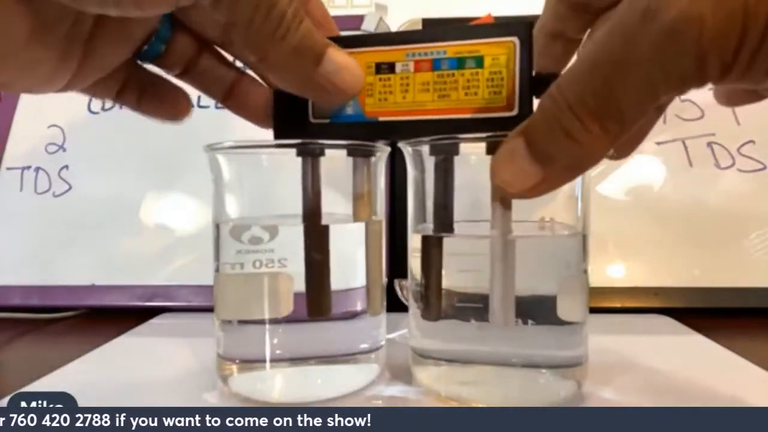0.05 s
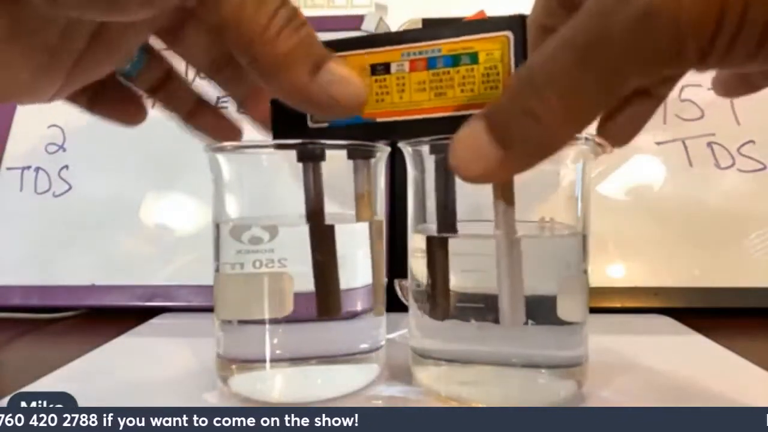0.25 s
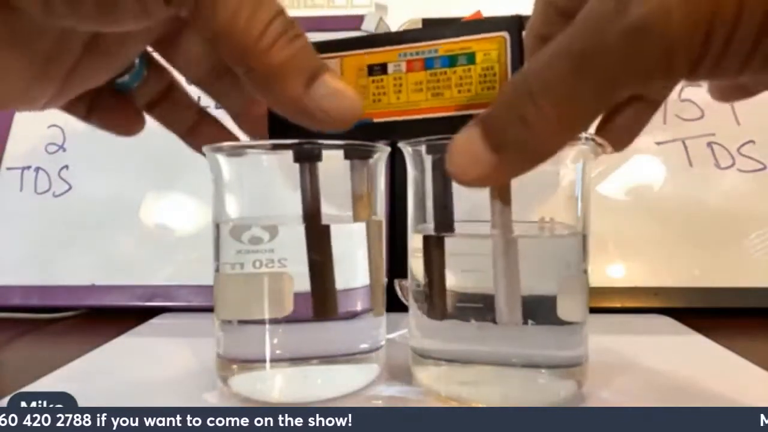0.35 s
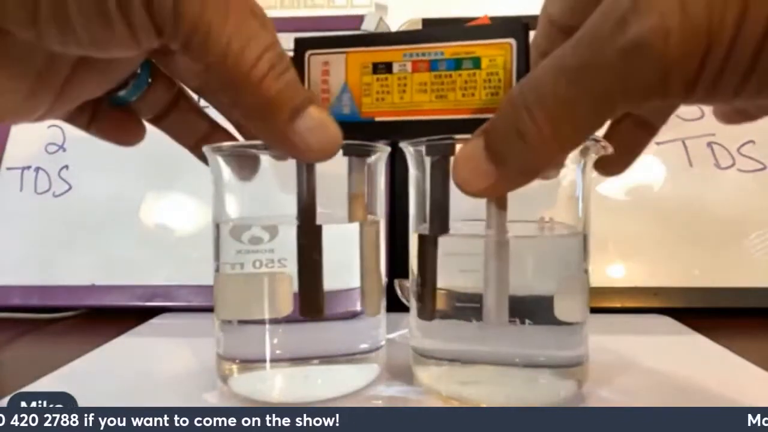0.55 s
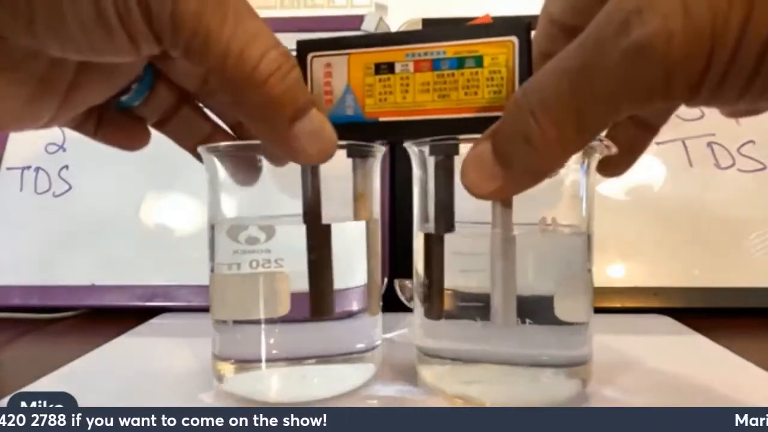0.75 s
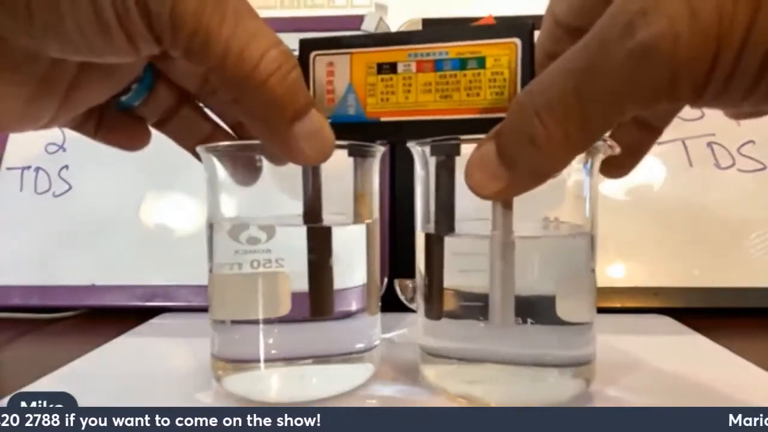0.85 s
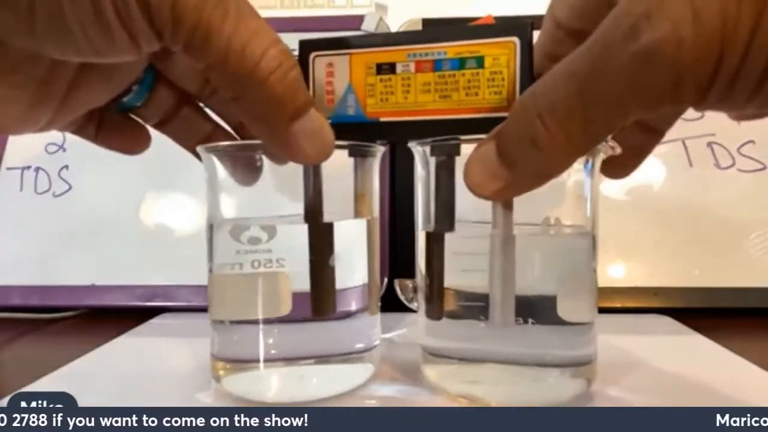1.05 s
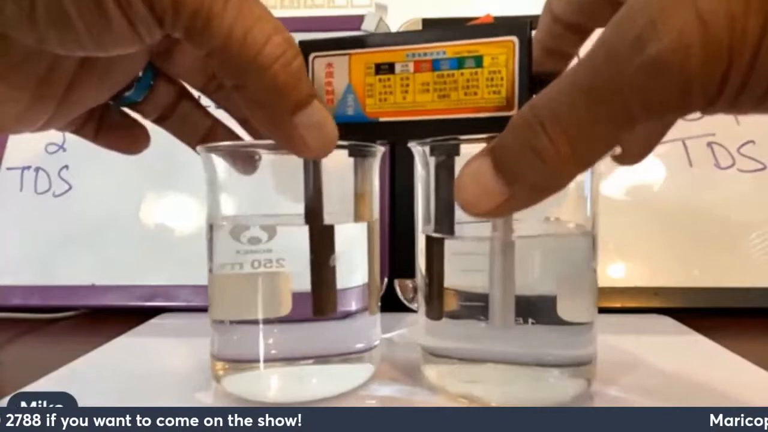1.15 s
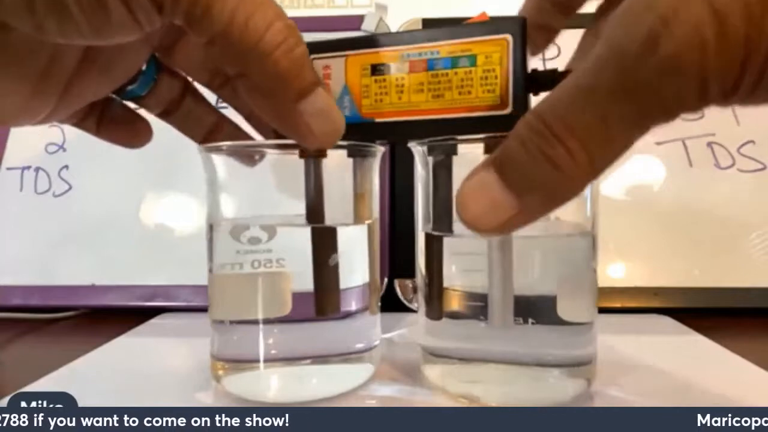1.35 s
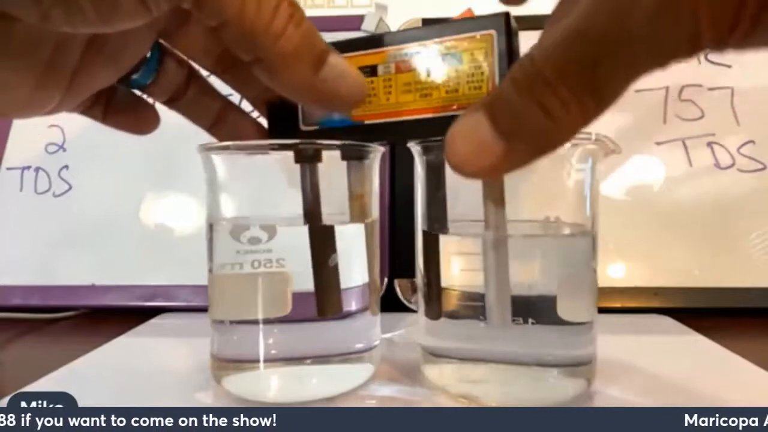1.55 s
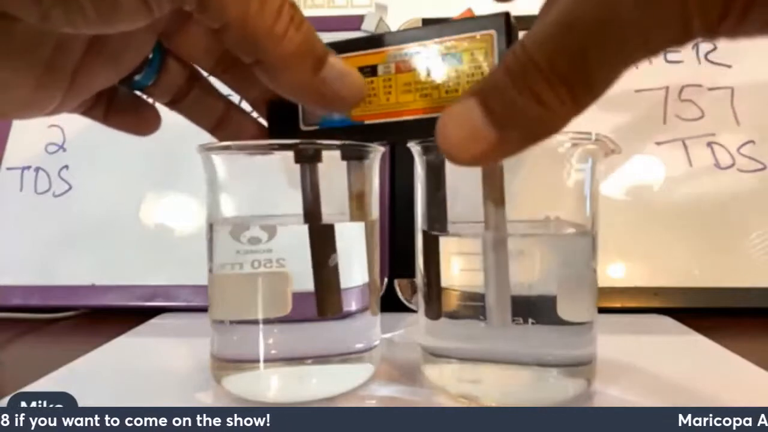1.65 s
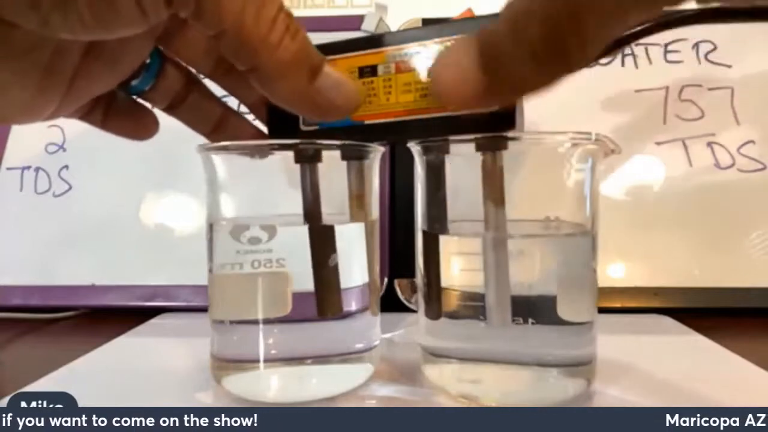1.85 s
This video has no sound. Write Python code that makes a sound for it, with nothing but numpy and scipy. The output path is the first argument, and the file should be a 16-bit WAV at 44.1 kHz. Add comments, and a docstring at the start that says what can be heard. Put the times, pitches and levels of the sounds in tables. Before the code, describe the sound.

Metal bars clink against glass beakers as they are shifted about. A ringing clink comes first, then a faint scrape and a few shorter clinks. Their plastic holder knocks once at the end, close by in a quiet room.

```python
"""Electrode bars in glass beakers.

Two pairs of metal bars are shifted about in two beakers in a small, quiet room. They tick, scrape
and chatter on the glass, which rings until a finger or bar stops it. Their plastic holder sounds
faintly under two clinks and knocks once at the end. A low hum lies underneath.
An echo suppressor turns the tails down."""
import sys
import numpy as np
from scipy import signal
from scipy.fft import rfft, irfft
from scipy.io import wavfile
from scipy.ndimage import uniform_filter1d

SR = 44100
rng = np.random.default_rng(int(sys.argv[2]) if len(sys.argv) > 2 else 0)


def pcm_store(signal):
    """Save signal as 16-bit PCM."""
    levels = np.round(np.clip(np.atleast_2d(signal), -1, 1) * 32767)
    wavfile.write(sys.argv[1], SR, levels.astype(np.int16).T)


N = 83790
TIME_S = np.arange(N) / SR
FREQ_HZ = np.maximum(np.arange(N // 2 + 1) * SR / N, 1)

# Modes of each body. Each row: frequency in Hz, level in dB, T60 in seconds.
FREE_BEAKER_MODES = [(952, -50.5, 1.5), (981.5, -54.5, 1.55), (2631.5, -52, .66), (2647, -50.5, .68),
                     (4230, -47, .1), (4690, -45, .135), (4983, -33.5, .14), (5091, -35.5, .13),
                     (5795, -44, .135), (6528, -24, .158), (6640, -36, .125), (7575, -46, .11),
                     (8073, -32, .14), (8183, -39, .15), (8408, -38, .15), (8665, -38, .135),
                     (9137, -45, .115), (9584, -45, .115), (11290, -42, .11), (11900, -46, .095)]
HELD_BEAKER_MODES = [(933, -68.5, 0.15), (2645, -45.5, 0.22), (4076, -49, 0.081), (4824, -56.5, 0.3),
                     (5358, -41.5, 0.055), (6400, -48, .11), (6270, -58.5, 0.075), (8200, -36.5, .1),
                     (7940, -46.5, 0.36), (9000, -57, 0.11), (8160, -46, 0.21), (9110, -65, 0.03)]
HOLDER_MODES = [(320, -52, .12), (405, -44, .12), (470, -44, .1), (545, -48, .05), (1090, -41, .04),
                (1160, -26, .056), (1255, -38, .06), (1360, -39, .055), (2420, -46, .085), (5180, -54, .09),
                (7000, -58, .08)]
# Blows on each body. Each row: start in seconds, level in dB, favoured frequency in Hz,
# fall-off in dB per octave squared, free ringing time in seconds.
FREE_BEAKER_BLOWS = [(.223, 0, 4000, .02, .305), (.766, -8, 1000, 6, .012), (1.117, -6, 2600, 8.5, .034)]
HELD_BEAKER_BLOWS = [(.7585, 8.5, 9040, 6, 0.043), (0.9233, 0, 3030, 0.71, 0.026)]
HOLDER_BLOWS = [(0.226, -13, 228, 6.1, .025), (0.768, -11, 220, 4.4, .035), (1.478, 0.5, 908, 0.13, 0.043)]
# Dry contacts of bars, glass and holder. Each row: start in seconds, level in dB, rise in seconds,
# lower and upper edge in Hz, resonance in Hz, resonance gain in dB, room tail in dB.
CONTACTS = [(0.138, -53.5, 0.00086, 3500, 11800, 8330, 16, -26),
            (0.2132, -36.5, 0.005, 2500, 8360, 3800, -11, -9),
            (.2195, -19, 0.0016, 3300, 11600, 8460, 9.5, -13),
            (0.2228, -23.5, .0008, 1700, 10350, 5850, 5.5, -19),
            (.2270, -29, 0.00027, 1050, 10200, 1204, 10, -14), (.46, -61, 0.013, 620, 805, 697, 4, -2.5),
            (.638, -57.5, 0.0019, 4000, 11000, 9000, 5, -18.5),
            (0.724, -40.5, 0.00049, 2550, 8750, 6630, 21, -4.5),
            (0.7299, -26, 0.00048, 4500, 10500, 10130, 14, -32.5),
            (0.73, -32, 0.00058, 1465, 3860, 3304, 7.5, -18),
            (0.7453, -52.5, .001, 1470, 10900, 6860, 5.5, 10.5),
            (0.756, -52, 0.0023, 3020, 11000, 6840, -4, -10),
            (.7585, -19, 0.0006, 4500, 10000, 8340, 13.5, -20.5),
            (0.7614, -25, 0.000509, 3210, 10000, 6590, 17, -18.5),
            (0.7759, -31.5, .0005, 2500, 10800, 3500, 7, -20),
            (0.9198, -31.5, 0.0019, 3570, 10100, 4000, 14.5, -23),
            (0.9233, -34.5, 0.00048, 1300, 8450, 5160, 14, -19.5),
            (1.1142, -39.5, 0.0025, 3270, 8870, 4850, 11, -19.5),
            (1.1161, -55.5, 0.00066, 1219, 10390, 2380, 7, -12),
            (1.465, -57, 0.00034, 300, 6570, 600, 7, 1.5), (1.478, -37.5, 0.0019, 400, 10500, 9300, 9, -20),
            (1.482, -36.5, .0005, 894, 9860, 2370, 17.5, -21.5), (1.479, -46, 0.0018, 273, 569, 400, 7, 0),
            (1.507, -51, 0.0016, 2480, 10500, 9520, 8, -39)]
# Envelope of a bar sliding on glass. Each row: time in seconds, level in dB.
SLIDE_LEVELS = [(.42, -97.5), (0.459, -84.5), (.5, -94.5), (0.536, -80), (.6, -93), (0.629, -77),
                (0.642, -53), (0.65, -64.5), (.68, -62), (.72, -62), (.755, -53.5), (.78, -90),
                (0.889, -93), (0.919, -61), (.93, -119)]
# Noise spectra. Each row: frequency in Hz, relative level in dB.
TICK_SPECTRUM = [(300, 5), (1000, 2.5), (2500, -4.5), (4000, -0.5), (6500, -0.5), (9000, -0.5), (11500, -4),
                 (12600, -14), (15500, -4)]
SLIDE_SPECTRUM = [(600, -38.5), (1800, -15), (4700, -15), (6900, -1), (7800, -12.5), (9000, 2.5),
                  (10500, -5.5), (12000, -31), (15000, -45.5)]
BACKGROUND_SPECTRUM = [(25, -30.5), (55, -25.5), (90, -13.5), (112, -10), (130, 3), (165, -5), (250, -9),
                       (340, -15.5), (550, -18.5), (1000, -23), (1600, -31.5), (3000, -33.5),
                       (10500, -39.5), (11500, -45.5), (15500, -54.5)]


def beaker_clinks():
    """Bars strike two beakers: one free, its close mode pairs beating, one damped by the hand."""
    free = struck(FREE_BEAKER_MODES, FREE_BEAKER_BLOWS, rise_s=.002)
    held = struck(HELD_BEAKER_MODES, HELD_BEAKER_BLOWS, rise_s=.00033)
    return free + held


def holder_knocks(low_cut_hz=278):
    """The plastic holder rings briefly, mostly in low modes."""
    highpass = signal.butter(3, low_cut_hz, "high", fs=SR, output="sos")
    return signal.sosfilt(highpass, struck(HOLDER_MODES, HOLDER_BLOWS, rise_s=.0007))


def struck(modes, blows, rise_s, stop_t60_s=.06):
    """Each blow favours one range of a body's modes, which ring until a touch stops them."""
    out, t = np.zeros(N), TIME_S[:SR // 2]
    for start_s, level_db, favoured_hz, fall_db, free_s in blows:
        ring = np.zeros_like(t)
        for hz, mode_db, t60_s in modes:
            gain = from_db(level_db + mode_db - fall_db * np.log2(hz / favoured_hz) ** 2)
            ring += gain * decay(t, t60_s) * np.sin(2 * np.pi * hz * t)
        attack = 1 - np.exp(-t / rise_s)
        add(out, start_s, ring * attack * decay(t - free_s, stop_t60_s))
    return out


def contact_ticks(t60_s=.018, peak_width_oct=.091):
    """Each contact is a crack of dense, fast-dying resonances with a tail in the room."""
    out = np.zeros(N)
    for start_s, level_db, rise_s, low_hz, high_hz, peak_hz, peak_db, room_db in CONTACTS:
        band = 1 / np.sqrt((1 + (low_hz / FREQ_HZ) ** 12) * (1 + (FREQ_HZ / high_hz) ** 20))
        peak = from_db(peak_db * np.exp(-.5 * (np.log2(FREQ_HZ / peak_hz) / peak_width_oct) ** 2))
        crack = noise(spectrum_gain(TICK_SPECTRUM) * band * peak)
        direct = (1 - np.exp(-TIME_S / rise_s)) * decay(TIME_S, t60_s)
        tail = from_db(room_db) * room_envelope()
        add(out, start_s, from_db(level_db) * (direct + tail) * crack)
    return out


def bar_slide(slips_per_s=1100, spread_db=2.2, slip_t60_s=.02):
    """A bar scrapes along the glass in tiny, uneven slips."""
    onsets = rng.random(N) < slips_per_s / SR
    slips = onsets * from_db(spread_db * np.minimum(rng.exponential(1, N), 4))
    energy = signal.lfilter([1], [1, -decay(2 / SR, slip_t60_s)], slips ** 2)
    grains = np.sqrt(energy + 1e-18) * rng.standard_normal(N)
    scrape = irfft(rfft(grains) * spectrum_gain(SLIDE_SPECTRUM), N)
    times_s, levels_db = np.transpose(SLIDE_LEVELS)
    sliding = (TIME_S > times_s[0]) * (TIME_S < times_s[-1])
    return from_db(np.interp(TIME_S, times_s, levels_db)) * sliding * scrape / np.std(scrape)


def room_reflections(x, level_db=-25):
    """Diffuse reflections: a decaying noise response."""
    response = rng.standard_normal(N) * room_envelope()
    return from_db(level_db) * signal.fftconvolve(x, response / np.linalg.norm(response))[:N]


def room_envelope(build_s=.004, t60_s=.175):
    """Reflections build up quickly and die away."""
    return (1 - np.exp(-TIME_S / build_s)) * decay(TIME_S, t60_s)


def background(hum_hz=118.6, hum_db=-76, noise_db=-67):
    """Mains hum in low room rumble and faint hiss."""
    hum = np.sqrt(2) * np.sin(2 * np.pi * (hum_hz * TIME_S + rng.random()))
    return from_db(hum_db) * hum + from_db(noise_db) * noise(spectrum_gain(BACKGROUND_SPECTRUM))


def suppress_echo(x, delay_s=.094, t60_s=.25, echo_db=-22, max_cut_db=5):
    """Each band is turned down while weaker than the echo expected from what came before."""
    _, frame_s, frames = signal.stft(x, SR, nperseg=512, noverlap=384)
    power = uniform_filter1d(abs(frames) ** 2, size=11, axis=-2)  # across frequency
    power = uniform_filter1d(power, size=3, axis=-1)  # across time
    pole = decay(2 * frame_s[1], t60_s)
    lingering = signal.lfilter([1 - pole], [1, -pole], power)
    delayed = np.array([np.interp(frame_s - delay_s, frame_s, band) for band in lingering])
    echo_power = delayed * from_db(2 * echo_db)
    gain = from_db(-max_cut_db * echo_power / (echo_power + power + 1e-20))
    return signal.istft(frames * gain, SR, nperseg=512, noverlap=384)[1][:N]


def from_db(db):
    """Decibels to gain."""
    return 10 ** (np.asarray(db) / 20)


def decay(t, t60_s):
    """Unity until t = 0, then 60 dB down per t60_s."""
    return np.exp(-np.log(1000) * np.maximum(t, 0) / t60_s)


def spectrum_gain(points):
    """Gain per frequency bin from (Hz, dB) points."""
    hz, db = np.transpose(points)
    return from_db(np.interp(np.log(FREQ_HZ), np.log(hz), db))


def noise(bin_gain):
    """Shaped noise, rms 1."""
    x = irfft(rfft(rng.standard_normal(N)) * bin_gain, N)
    return x / np.std(x)


def add(out, start_s, sound):
    """Mix a sound in from start_s."""
    start = int(start_s * SR)
    part = sound[:N - start]
    out[start:start + len(part)] += part


def scene():
    """Glass, bars and holder close by in the room; mono."""
    ringing = beaker_clinks() + holder_knocks()
    return (ringing + room_reflections(ringing) + contact_ticks() + bar_slide() + background())[None]


def record(dry):
    """Echo suppression, then a steep treble cut."""
    cutoff_hz = 15550
    lowpass = signal.ellip(10, .1, 70, cutoff_hz, fs=SR, output="sos")
    return signal.sosfilt(lowpass, suppress_echo(dry[0]))[None]


dry = scene()
out = record(dry)
pcm_store(out)
```